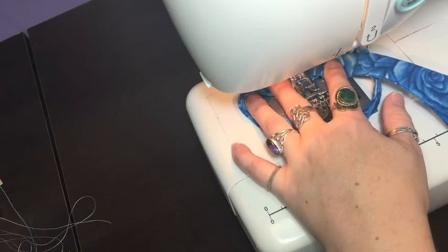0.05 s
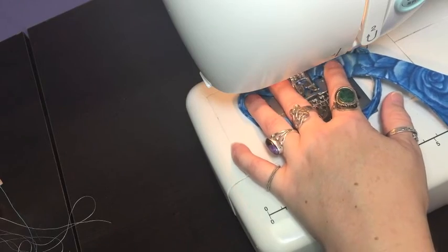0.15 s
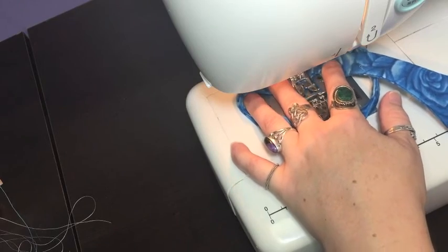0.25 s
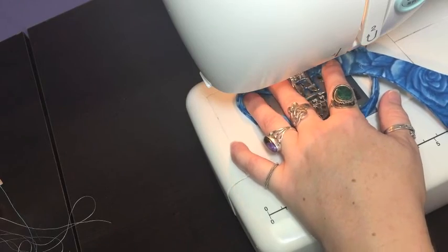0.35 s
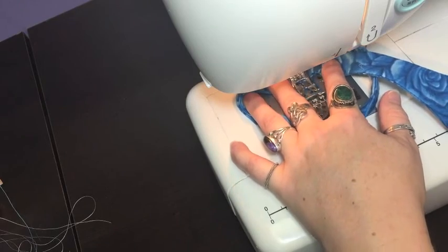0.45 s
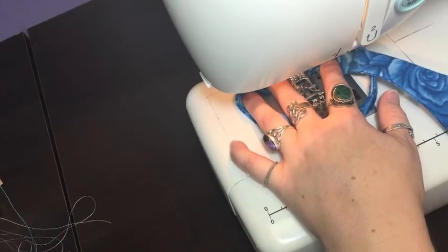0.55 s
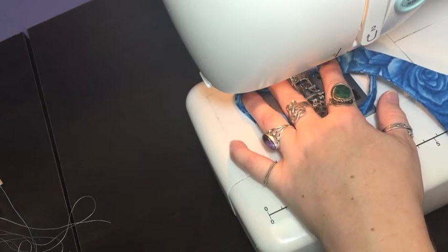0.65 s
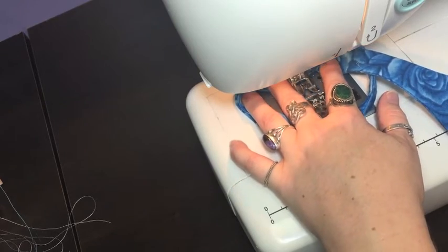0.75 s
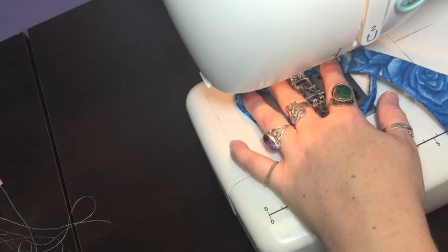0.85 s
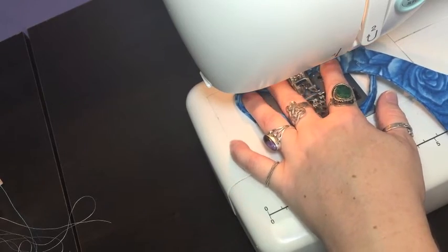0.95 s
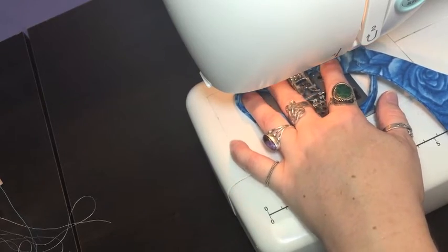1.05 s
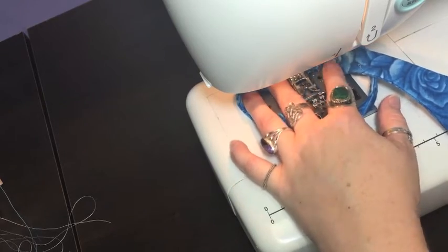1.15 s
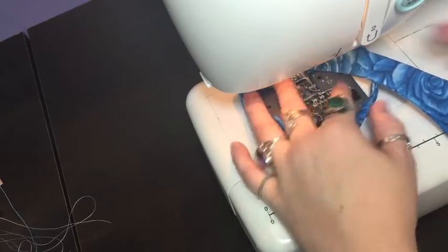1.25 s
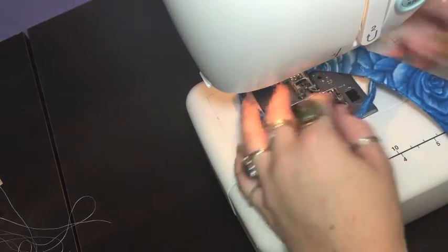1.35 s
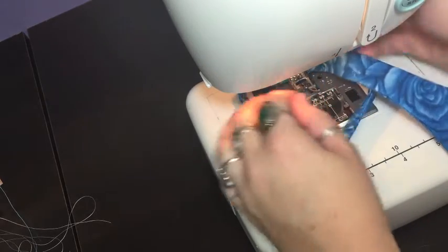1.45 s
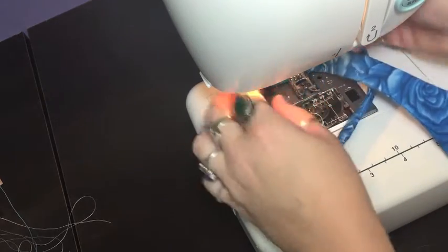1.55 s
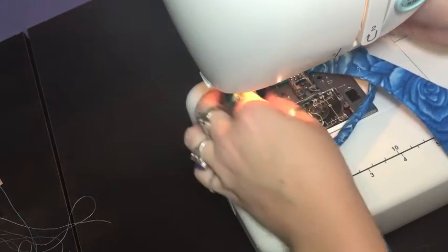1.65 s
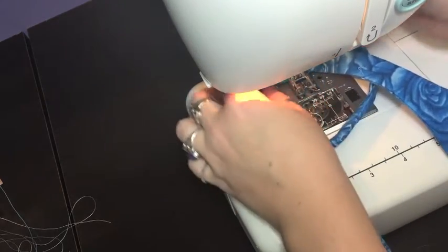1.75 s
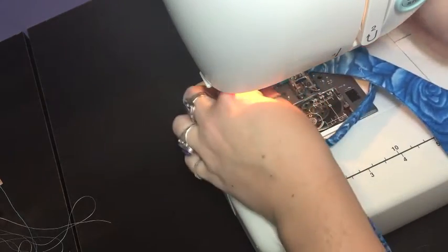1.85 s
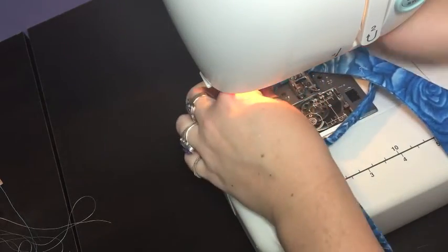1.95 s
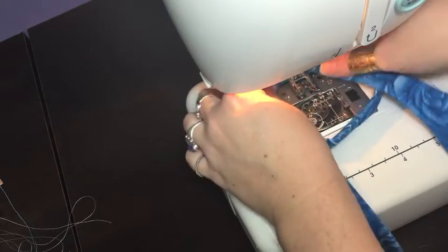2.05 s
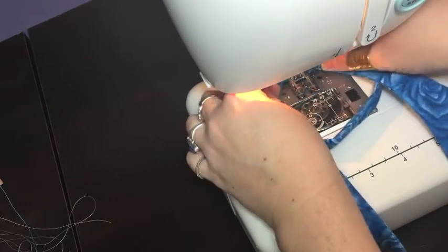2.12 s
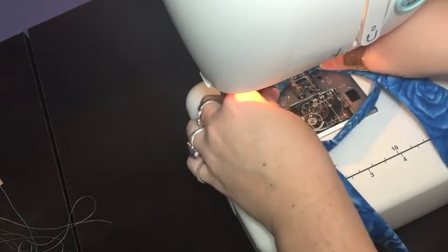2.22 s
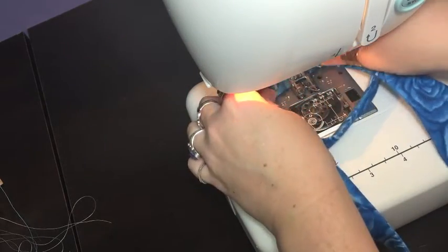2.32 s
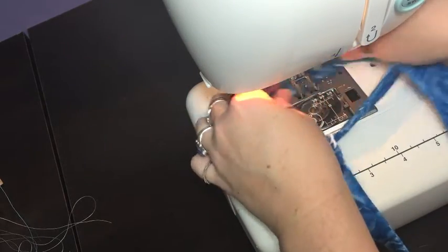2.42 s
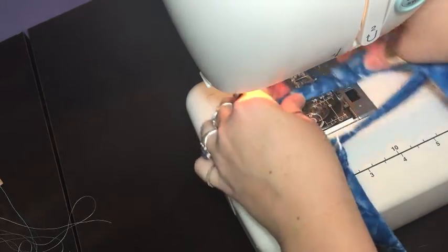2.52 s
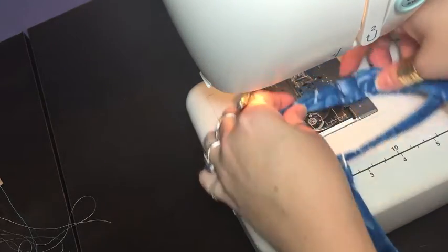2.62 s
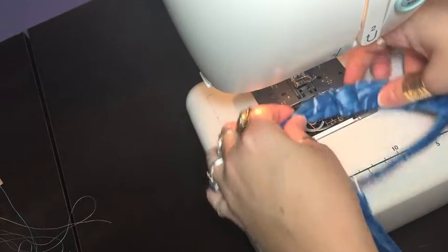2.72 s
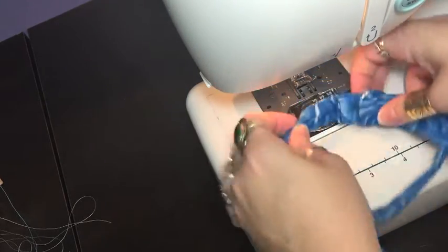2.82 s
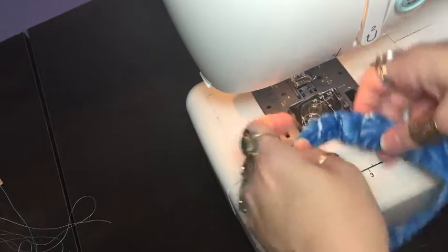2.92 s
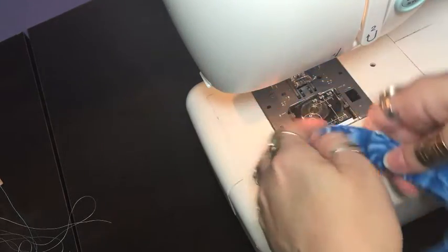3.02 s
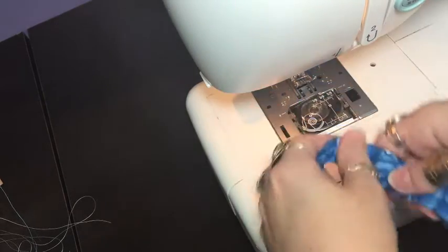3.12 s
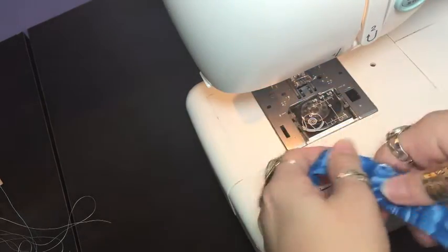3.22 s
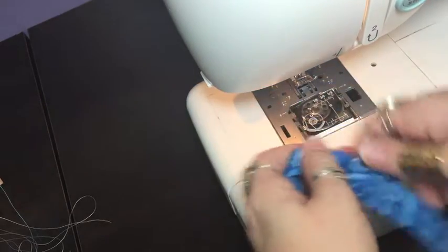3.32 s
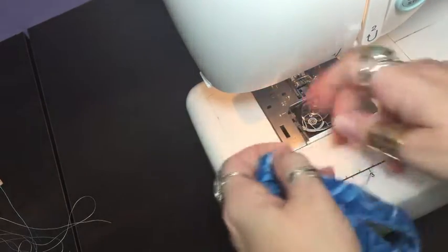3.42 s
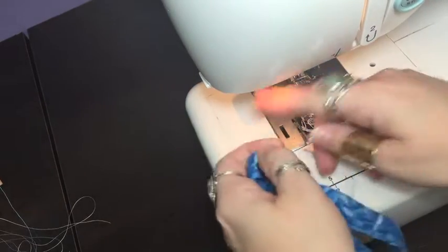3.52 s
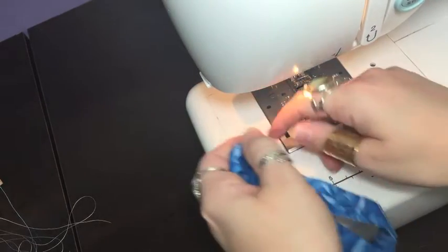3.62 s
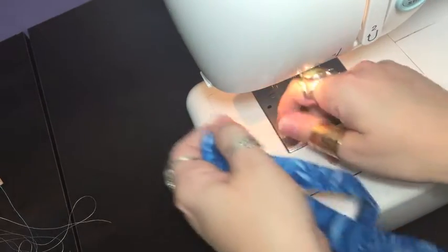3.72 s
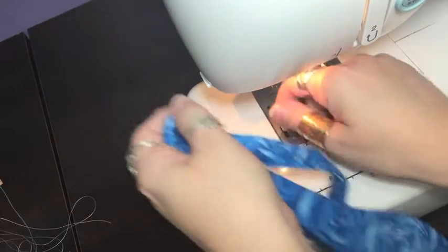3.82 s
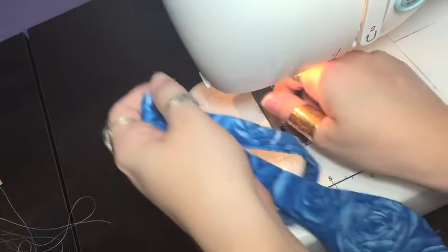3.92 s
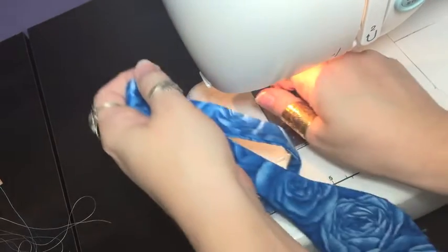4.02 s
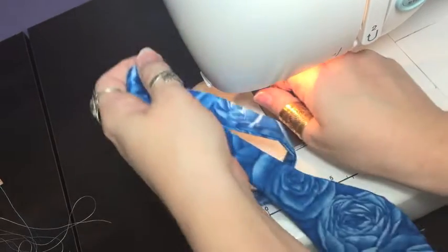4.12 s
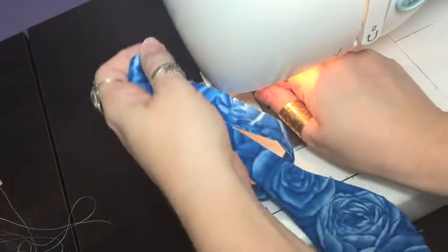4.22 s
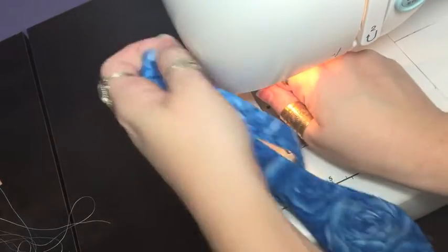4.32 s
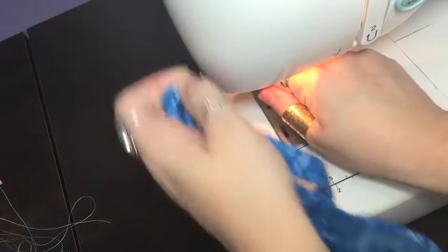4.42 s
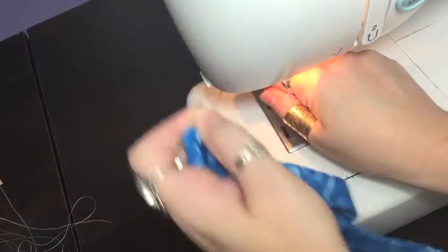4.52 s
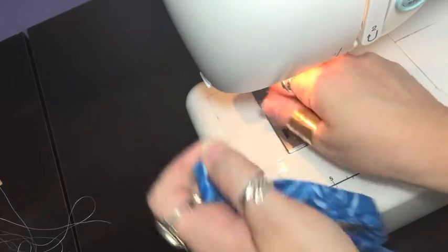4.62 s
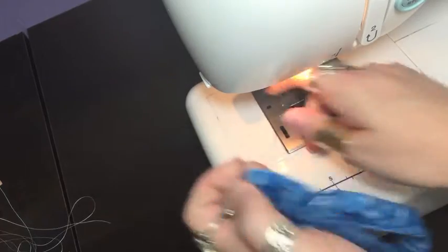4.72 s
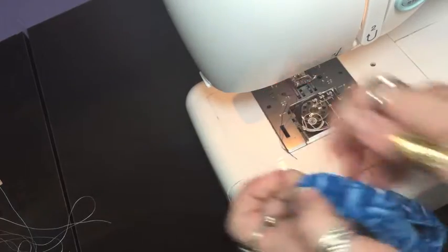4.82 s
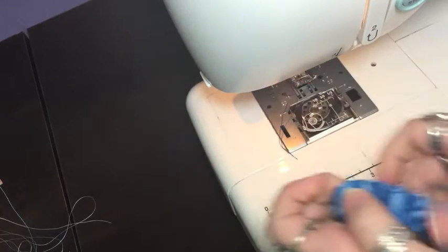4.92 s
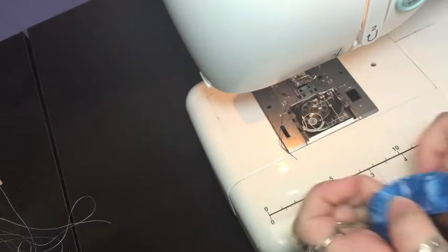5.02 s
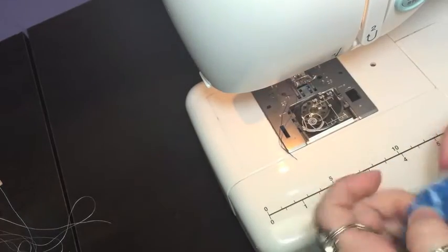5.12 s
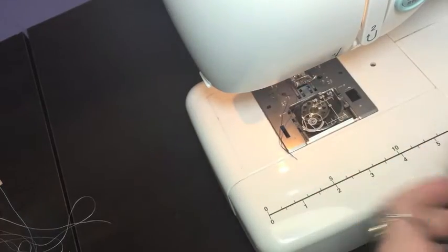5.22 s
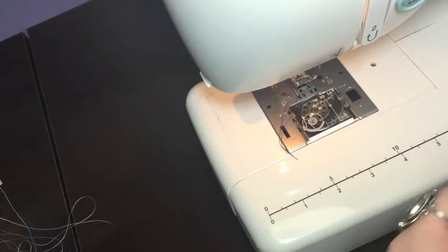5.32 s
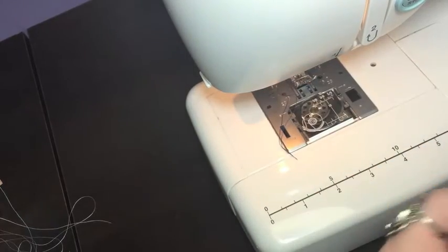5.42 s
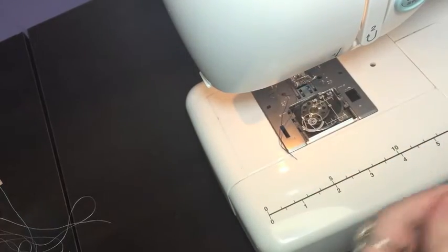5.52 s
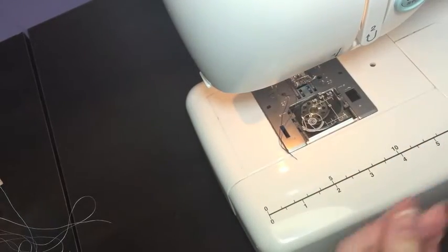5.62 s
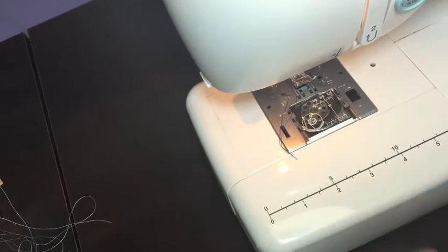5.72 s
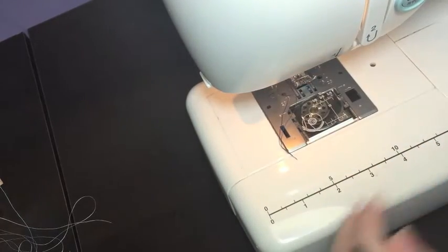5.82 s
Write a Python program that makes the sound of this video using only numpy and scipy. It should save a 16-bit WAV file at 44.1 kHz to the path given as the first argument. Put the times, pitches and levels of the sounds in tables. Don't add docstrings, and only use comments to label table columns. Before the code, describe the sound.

Low ragged motor hum with needle clacks ends abruptly, followed by sparse plastic and metal clicks, soft cloth rubbing and light table thumps.

```python
import sys
import numpy as np
from scipy import signal
from scipy.fft import rfft, irfft, next_fast_len
from scipy.io import wavfile
from scipy.ndimage import uniform_filter1d

SR = 44100
rng = np.random.default_rng(int(sys.argv[2]) if len(sys.argv) > 2 else 0)


def boost(x):
    u = np.asarray(x, float) / 20
    return 10 ** u


def generate_wav(signal):
    frames = np.transpose(np.atleast_2d(signal))
    scaled = np.clip(frames, -1, 1) * 32767
    pcm = np.round(scaled).astype(np.int16)
    wavfile.write(sys.argv[1], SR, pcm)


N = 258676
TIME = np.arange(N) / SR

# (frequency [Hz], density [dB per Hz])
AIR = [(13, -55), (22, -3), (43, 14), (125, -5.5), (217, -19), (263, -7.5), (347, -16), (432, -14),
       (618, -21), (988, -18.5), (2520, -27), (13200, -37.5), (16000, -36)]
# (middle [s], length [s], level [dB])
LEANS = [(0.0, 0.068, -55), (0.33, 0.43, -60), (0.68, .25, -56), (1.03, 0.27, -55), (1.24, 0.12, -56),
         (2.1, 0.49, -58.5), (2.47, .07, -62), (2.94, 0.25, -48), (3.2, 0.075, -56), (3.39, 0.2, -53.5),
         (3.9, 0.28, -54), (5.0, 0.29, -61), (5.23, 0.41, -52.5)]
# (middle [s], length [s], level [dB])
BUMPS = [
    (1.3, 1, -59.5),
    (2.47, 0.086, -55),
    (2.88, 0.3, -51.5),
    (3.14, 0.09, -56.5),
    (3.27, 0.15, -56.5),
    (3.5, 0.088, -48.5),
    (4.51, 0.16, -46),
    (5.04, 0.085, -43.5),
    (5.27, 0.09, -48),
    (5.65, 0.47, -66),
]
# (time [s], load [dB])
LOAD = [(0.0, -45.5), (0.11, -40.5), (.17, -40.5), (.22, -41), (0.3, -44.5), (.38, -44), (0.45, -43.5),
        (.53, -41.5), (0.6, -38.5), (0.67, -51), (.72, -52.5), (.77, -49), (0.84, -49), (.97, -47.5),
        (1.04, -47.5), (1.12, -46.5), (1.17, -71)]
# (middle [s], length [s], note level [dB])
STROKES = [
    (0.0, 0.099, -35),
    (0.09, 0.11, -35),
    (0.2, 0.063, -34.5),
    (0.3, .13, -34),
    (0.43, 0.15, -36.5),
    (0.6, 0.08, -36),
    (0.87, 0.23, -37),
    (1.11, 0.16, -46),
]
# (frequency [Hz], density [dB per Hz])
RUMBLE = [(82, -49), (140, -27), (158, -6.5), (296, -6), (799, -12), (968, -8.5), (1810, -28.5),
          (2750, -64), (3510, -37), (9000, -27.5), (11700, -91), (19800, -120)]
# (frequency [Hz], width [Hz], level [dB])
GEARS = [(194.6, 18, 0), (263, 24, -31), (293, 62, -12), (364, 10, -8), (457, 19, -1), (510, 9.6, -5),
         (960, 100, -35), (1220, 40, -28), (1440, 57, -20), (2040, 39, -17.5)]
# (time [s], peak [dB], lowest [Hz], highest
# [Hz])
TICKS = [(.002, -48, 1500, 9000), (2.3945, -39, 3000, 10000), (2.4095, -38, 2500, 9500),
         (2.4165, -46, 8000, 15500), (2.42, -46, 2800, 8000), (2.434, -40, 6300, 9500),
         (2.4415, -44, 6000, 10900), (2.4492, -40, 6000, 9000), (2.4495, -47, 9500, 14000),
         (2.463, -47, 9500, 11500), (2.474, -50, 5000, 10000), (4.4275, -38, 12000, 15500),
         (4.445, -38, 12500, 15500), (4.4715, -37, 11300, 13300), (4.421, -42, 3900, 5000),
         (4.3645, -52, 2200, 5200), (4.7642, -19, 1700, 3800), (2.476, -54, 9000, 15000),
         (2.4875, -43, 9500, 15500), (2.877, -45.5, 4000, 11000), (2.914, -58, 5000, 12000),
         (3.263, -56, 9000, 15000), (3.333, -66, 8000, 13000), (3.386, -51, 12000, 15500),
         (3.48, -57, 10500, 15000), (4.716, -56, 500, 1500), (4.7626, -25, 2000, 14000),
         (4.4725, -27, 1700, 3200), (1.971, -31.5, 905, 3480), (1.571, -33, 3000, 13900),
         (.092, -42, 600, 3030), (2.245, -58, 6000, 14000), (4.405, -56, 3500, 6000),
         (4.435, -52, 3500, 15000), (5.168, -57, 6500, 15000), (5.58, -63, 6000, 14000)]
CASE_HZ = [550, 745, 985, 1230, 1430, 1660, 1940, 2080, 2420, 2560, 2820, 3200, 3540, 3770, 4150, 4400,
           5200, 5600, 6500, 7500, 8300, 9700, 11500, 13300]
# (time [s], peak [dB], body share [dB], edge share [dB])
LINKAGE = [(0.0747, -46, 7, -17), (0.0914, -46.5, 14, -3), (0.1044, -51, 7, -5), (0.1486, -33, 1.5, -6),
           (0.1984, -33.5, 4.5, -1), (0.2201, -43, 12, 0), (0.2374, -53, 17, -22), (0.2721, -53, 16, -26),
           (0.4659, -32.5, -3, -10.5), (0.5178, -35.5, 3.5, -2.5), (0.5245, -29, -5, 0),
           (0.5474, -36.5, 5, -9), (0.5914, -39, 9.5, -24), (0.6, -49, 0, -28), (1.0096, -36, -0.5, -17)]
# (time [s], peak [dB], body share [dB], edge share [dB])
LEVER = [(1.5708, -22, -2.5, -9.5), (1.5844, -40, 9.5, -19), (1.6467, -40.5, 7, -23),
         (1.7185, -43.5, 11.5, -29), (1.7914, -42, 7.5, -13), (1.7974, -36.5, 5, -13),
         (1.9701, -36.5, 13.5, 0.5), (1.9816, -57, 16, -18), (2.2287, -40, 2, -10), (2.4862, -46, 11, -5),
         (3.4329, -70, 8, -16), (3.4574, -54, 5, -20), (3.464, -39, -0.5, -22), (4.0244, -48, -12, -22),
         (4.519, -47, 10.5, -19), (4.74, -48, 4, -4)]
# (time [s], peak [dB], body share [dB], edge share [dB])
JEWELS = [(1.735, -53, 2, -20), (1.7509, -42.5, 4.5, -25), (1.786, -46, 0, -8), (2.021, -61, 1, -13),
          (2.0543, -48.5, 7.5, -25), (2.072, -53, 8, -19), (2.1846, -36, -4, 6), (2.821, -35.5, -4, -36),
          (2.8583, -30, 0, -17), (3.3941, -45.5, -15, 9), (4.346, -44, -18, -25), (4.4448, -31, -13, -5),
          (4.471, -21.5, -12, -12.5), (4.6904, -43, -4, -7.5)]
# (time [s], peak [dB], body share [dB], edge share [dB])
PLATE = [(2.3942, -50, -16, -3), (2.4092, -45, -19, -10), (2.4346, -50, -12, -5), (2.797, -39.5, -4, -4),
         (3.7728, -19, -14.5, -21.5), (3.8302, -25, -6, -25), (3.9978, -47, -1.5, -10),
         (4.1117, -66, -8, 17.5), (4.4204, -41, -19, -5), (4.4269, -34, -15, -5),
         (4.7623, -17.5, -11.5, -2.5)]
# (middle [s], length [s],
# level [dB], frequency [Hz])
SQUEAKS = [(0.088, 0.044, -65, 3680), (0.088, 0.046, -63.5, 4700), (0.293, 0.072, -58, 990),
           (.3, 0.13, -50, 442), (.47, .07, -45.5, 450), (.57, 0.055, -52, 550), (.77, .05, -49, 403),
           (1.05, .1, -56, 505), (.88, 0.17, -70, 2050), (0.956, 0.037, -58, 960), (1.165, 0.021, -61, 930),
           (2.097, 0.067, -60.5, 1230), (2.51, .05, -52, 750), (2.575, .14, -59.5, 1606),
           (2.59, 0.1, -56, 750), (2.753, 0.11, -60.5, 750), (2.992, 0.081, -53, 1450),
           (2.991, 0.054, -62, 2700), (3.01, 0.042, -50.5, 750), (3.121, 0.062, -51, 1440),
           (3.136, .06, -65, 2450), (3.229, 0.06, -55, 750), (3.635, .03, -76, 6000),
           (3.74, 0.065, -77, 6000), (3.74, 0.084, -60, 1590), (3.928, 0.076, -72, 1660),
           (4.061, .06, -60, 750), (4.4, 0.05, -62, 4300), (3.445, .025, -60, 1700),
           (1.755, .022, -56, 2900), (1.795, .025, -53, 2750), (3.18, .06, -62, 2400),
           (2.875, .03, -57, 1500), (3.397, .02, -64, 2750), (3.745, .04, -66, 3100), (3.8, .05, -62, 5200),
           (4.93, .05, -71, 2000), (5.031, 0.06, -73, 2000), (5.13, .05, -73, 3700), (5.175, .04, -66, 750),
           (5.503, .04, -71, 1700), (5.65, .06, -75, 1750), (5.758, .1, -76, 2460)]
# (time [s], peak [dB], frequency [Hz], t60 [s])
THUDS = [(0.097, -34, 341, 0.086), (0.198, -40, 360, 0.12), (.275, -48, 418, 0.068),
         (.49, -44.5, 473, 0.072), (.83, -47.5, 296, 0.075), (.102, -39, 720, .06), (0.594, -38, 224, 0.12),
         (0.769, -41.5, 211, 0.04), (1.099, -45, 302, 0.1), (1.599, -48, 428, 0.11),
         (1.724, -38.5, 212, 0.16), (1.801, -36, 286, 0.025), (1.818, -47, 356, 0.083),
         (2.41, -44.5, 480, 0.089), (2.858, -46.5, 227, 0.23), (3.455, -40, 292, 0.1),
         (3.464, -47, 484, .05), (4.448, -43, 237, 0.051), (4.475, -39, 219, 0.16),
         (4.516, -50.5, 240, 0.11), (4.689, -47.5, 416, 0.11), (4.761, -47.5, 320, 0.15),
         (4.764, -43, 560, 0.052)]
# (time [s], peak [dB], frequency [Hz], t60 [s])
RINGS = [(.149, -42, 4100, .03), (.2, -43.5, 4740, 0.021), (0.27, -45.5, 2660, 0.044),
         (.525, -40, 3595, 0.037), (.525, -47, 4630, 0.036), (1.572, -42, 1315, .12),
         (1.572, -44, 2940, 0.096), (1.572, -46, 727, 0.08), (1.973, -33.5, 1714, .037),
         (1.971, -34, 670, 0.092), (1.972, -41, 1570, 0.14), (.2, -48, 3590, 0.12), (.6, -44, 1627, 0.2),
         (1.01, -43, 1230, 0.05), (1.969, -31.5, 2790, 0.029), (2.484, -45, 1475, 0.17),
         (2.824, -35.5, 2040, 0.09), (2.859, -43.5, 2055, 0.13), (2.856, -42, 2784, 0.088),
         (2.824, -44, 3760, 0.071), (2.823, -38, 1720, 0.086), (3.776, -33.5, 1655, 0.034),
         (3.774, -35, 3780, 0.057), (3.775, -41.5, 2595, 0.095), (3.774, -45, 5560, .03),
         (4.445, -39, 2770, 0.057), (4.471, -34, 4170, .04), (4.472, -36.5, 5900, .03),
         (3.774, -35.5, 4050, 0.073), (3.829, -34, 3840, 0.038), (3.997, -49.5, 2560, 0.04),
         (4.023, -50, 1460, 0.071), (4.299, -63.5, 990, .08), (4.346, -46, 2580, 0.047),
         (4.344, -48, 990, 0.053), (4.375, -56, 990, .04), (4.425, -51, 990, 0.048),
         (4.45, -43, 990, 0.063), (4.475, -30.5, 2660, 0.026), (4.692, -46.5, 1657, 0.078),
         (4.763, -23, 2410, 0.022), (4.764, -33, 1904, .04), (4.764, -30, 3190, 0.048),
         (4.764, -30, 2850, 0.043), (4.763, -39, 5550, 0.031), (4.764, -40, 4330, 0.049),
         (4.741, -52, 1700, 0.054), (4.69, -45, 500, .05), (3.463, -42, 980, .07)]
# (middle [s], length [s], pressure [dB])
PULLS = [(1.63, 0.25, -55.5), (1.81, 0.1, -55), (2.0, 0.11, -61.5), (2.1, 0.17, -70), (2.415, 0.054, -54),
         (2.455, 0.045, -45.5), (2.495, 0.054, -44.5), (2.575, 0.093, -53.5), (2.7, 0.46, -60.5),
         (2.89, 0.19, -53), (3.0, 0.081, -49.5), (3.11, 0.16, -53), (3.19, 0.062, -51),
         (3.26, 0.067, -55.5), (3.455, 0.054, -52.5), (3.81, 0.14, -47.5), (3.91, 0.22, -59),
         (4.04, .09, -56), (4.38, 0.086, -63), (4.46, 0.11, -55.5), (4.73, 0.1, -60), (5.18, 0.042, -64),
         (1.12, 0.023, -53), (5.23, .05, -72), (5.5, 0.099, -72), (5.7, .15, -71)]
# (middle [s], length [s], scrape [dB], weave hiss share [dB])
SCUFFS = [(1.604, 0.21, -68, -11), (1.75, 0.084, -61, -11), (2.11, 0.065, -69, -2), (2.43, 0.042, -78, 7),
          (2.459, 0.041, -50.5, -13), (2.855, 0.16, -65, -3.5), (3.06, 0.1, -70.5, 3),
          (3.16, 0.05, -73, -8), (3.265, 0.035, -86, 5), (3.393, 0.12, -86, 10), (3.797, 0.091, -62, -18),
          (4.01, 0.036, -61.5, -17), (4.39, 0.075, -57.5, -13), (4.445, 0.071, -54.5, -9),
          (4.52, 0.055, -66, -11), (5.126, 0.081, -81.5, 8), (5.18, .04, -74, -6), (5.58, .1, -75.5, -6),
          (3.612, .1, -81, 2), (3.477, .04, -74, 4)]
# (frequency [Hz], width [Hz], level [dB])
BED = [(385, 36, 4), (519, 50, 11), (750, 37, 14.5), (990, 47, 14.5), (1230, 15, 9), (1440, 39, 13),
       (1647, 9.6, 9.5), (1630, 32, -29), (2000, 53, -40), (2380, 75, -10.5)]
# (frequency [Hz], width [Hz], level [dB])
SCRAPE = [(2530, 90, 0), (3200, 120, -4), (4150, 200, 0), (4600, 150, -4), (6000, 300, -12)]


def unit(x):
    return x / np.sqrt(np.mean(x ** 2))


def noise():
    return rng.standard_normal(N)


def band(x, lo_hz, hi_hz):
    return signal.sosfilt(signal.butter(2, [lo_hz, hi_hz], "band", fs=SR, output="sos"), x)


def shaped(points):
    hz, db = np.transpose(points)
    f = np.maximum(np.arange(N // 2 + 1) * SR / N, 1)
    return irfft(rfft(noise()) * boost(np.interp(np.log(f), np.log(hz), db)), N)


def walk(rate_hz):
    k = int(SR / rate_hz)
    held = np.repeat(rng.standard_normal(N // k + 1), k)
    return 0.74 * uniform_filter1d(uniform_filter1d(held, k), k)[:N]


def resonate(x, modes, flicker_db=0):
    out = np.zeros(N)
    for hz, width, db in modes:
        ringing = signal.lfilter(*signal.iirpeak(hz, hz / width, SR), x)
        out += boost(db + flicker_db * walk(22.03)) * ringing / np.sqrt(width)
    return out


def even(x, share):
    envelope = np.abs(signal.hilbert(x, next_fast_len(N))[:N] + 1e-9)
    return unit(x / envelope ** share)


def steady(x, size=2600):
    return x / np.sqrt(uniform_filter1d(x ** 2, size=size))


def swells(rows, rest_db=-120):
    t = TIME[::32]
    power = boost(2 * rest_db)
    for s, length, db in rows:
        power = power + boost(2 * db) * np.exp(-8 * ((t - s) / length) ** 2)
    return np.interp(TIME, t, np.sqrt(power))


def add(track, s, sound):
    i = int(s * SR)
    track[i:i + len(sound)] += sound[:N - i]


def air():
    hiss = shaped(AIR)
    room = band(hiss, 117.5, 20000) * boost(-66 + 1.1 * walk(2.24)) / np.std(band(hiss, 150, 15000))
    hum = boost(-67.5) * unit(resonate(noise(), [(187.3, 13.6, 0)], 4.7))
    stir = boost(-89.5) * unit(resonate(noise(), BED, 2.6))
    fan_modes = [(985, 68, 1.0), (1783, 140, 2.5), (2000, 92, -5), (2420, 140, -5)]  # Hz, width Hz, dB
    fan = unit(resonate(noise(), fan_modes, 3.8))
    return room + hum + stir + swells([(5.25, 2.5, -73), (1.26, 0.44, -73)], -80.5) * fan


def table():
    after = np.clip((TIME - 1.17) / 0.064, 0, 1)
    sway = resonate(noise(), [(58, 16, 0)])
    note = resonate(noise(), [(122.8, 22, 0)])
    swaying = swells(LEANS, rest_db=-63.5) * even(band(sway, 49, 82), 0.3)
    humming = swells(BUMPS, rest_db=-60.5) * even(band(note, 85, 153), 0.35)
    return swaying + after * humming


def motor():
    load_db = np.interp(TIME, *np.transpose(LOAD))
    stop_s, whine_hz, waver_hz = 1.246, 2760, 110
    running = np.clip((stop_s - TIME) / 0.073, 0, 1)

    turn = 2 * np.pi * 122.5 * TIME + 0.7 * walk(41.23)
    note = np.sin(turn) + 0.13 * np.sin(2 * turn + .6) + .08 * np.sin(3 * turn)
    note = note * np.sqrt(2) * swells(STROKES, -60) * boost(2.6 * walk(34.3))

    mesh = noise() * boost(3.5 * walk(160))
    broad = unit(shaped(RUMBLE)) * boost(1.4 * walk(89.8) + 3.2 * walk(24.7))
    frame = unit(resonate(mesh, GEARS, 9.2)) + boost(-1.0) * broad
    rumble = steady(band(frame, 198, 1024))
    rasp = steady(band(frame, 720, 4160)) + boost(-24.0) * unit(band(mesh, 2200, 11600))

    breathy = even(resonate(noise(), [(whine_hz, 130, 0)]), 0.25)
    whine_turn = 2 * np.pi * np.cumsum(whine_hz + waver_hz * walk(45)) / SR
    whine = .9 * breathy + .7 * np.sin(whine_turn) * boost(3 * walk(30))
    whine += boost(-7) * unit(resonate(mesh, [(3200, 90, 0), (3650, 60, -5), (2030, 70, -8)]))

    rasp_gain = boost(-48 + 1.5 * (load_db + 42.5))
    whine_gain = boost(-62.5 + 0.7 * (load_db + 40.5) + 2.7 * walk(14.5))
    return running * (note + boost(load_db) * rumble + rasp_gain * rasp + whine_gain * whine)


def ticks():
    out, t = np.zeros(N), np.arange(int(.03 * SR)) / SR
    for s, db, lo_hz, hi_hz in TICKS:
        snap = rng.standard_normal(len(t)) * np.exp(-t / 0.0022)
        tick = band(band(snap, lo_hz, hi_hz), lo_hz, hi_hz)
        add(out, s, boost(db) * tick / np.abs(tick).max())
    return out


def clicks(rows, t60_s, low_db, close_s):
    out, t, modes = np.zeros(N), np.arange(int(.14 * SR)) / SR, np.array(CASE_HZ)[:, None]
    fall = np.log(1000) * t / t60_s
    rise = 1 - np.exp(-t / close_s)
    mode_decay = np.exp(-1.2 * fall * (modes / 2000) ** .3)
    crack_decay = 1.04 * np.exp(-t / 0.00078) + np.exp(-1.1 * fall) + boost(-42.0) * np.exp(-.3 * fall)
    for s, db, mid_db, top_db in rows:
        level_chance, pitch_chance = rng.standard_normal((2, len(modes), 1))
        rough, bright = rng.standard_normal((2, len(t)))
        chatter = (rough ** 3 * np.exp(-2.2 * fall) * rise)[:900]
        tones = np.sin(2 * np.pi * modes * (1 + 0.023 * pitch_chance) * t)
        ring = np.sum(boost(2.1 * level_chance) * mode_decay * tones, axis=0)
        blow = signal.fftconvolve(ring, chatter)[:len(t)]
        crack = band(bright, 210, 14000) * rise * crack_decay
        blow = blow / np.abs(blow).max() + 0.74 * crack
        shares = ((580, 1050, mid_db + low_db), (1050, 2100, mid_db), (2200, 6500, 0), (6800, 16000, top_db))
        for lo, hi, share_db in shares:
            part = band(band(blow, lo, hi), lo, hi) * np.exp(-.3 * fall * (lo / 6800) ** 2)
            add(out, s, boost(db + share_db - 4.5) * part / np.abs(part).max())
    return out


def machine_clicks():
    return (clicks(LINKAGE, t60_s=0.042, low_db=-2.1, close_s=0.0027)
            + clicks(LEVER, t60_s=0.033, low_db=-2.5, close_s=0.0013)
            + clicks(JEWELS, t60_s=0.03, low_db=-12, close_s=0.0023)
            + clicks(PLATE, t60_s=0.04, low_db=-4.5, close_s=0.00036))


def squeaks():
    out, t = np.zeros(N), np.arange(-.2 * SR, .2 * SR) / SR
    for s, length, db, hz in SQUEAKS:
        half_hz = 45 + .01 * hz
        tone = unit(band(rng.standard_normal(len(t)), hz - half_hz, hz + half_hz))
        bell = boost(db) * tone * np.exp(-4 * (t / length) ** 2)
        add(out, max(s - .2, 0), bell[int(max(.2 - s, 0) * SR):])
    return out


def thuds():
    out, t = np.zeros(N), np.arange(int(.3 * SR)) / SR
    for s, db, hz, t60 in THUDS:
        push = rng.standard_normal(len(t)) * np.exp(-np.log(1000) * t / t60) * (1 - np.exp(-t / 0.0011))
        knock = band(push, hz / 1.167, hz * 1.28) + 0.31 * band(push, 154, 483)
        add(out, s, boost(db + 6.5) * knock / np.abs(knock).max())
    return out


def rings():
    out, t = np.zeros(N), np.arange(int(.25 * SR)) / SR
    for s, db, hz, t60 in RINGS:
        rough = unit(band(rng.standard_normal(len(t)), hz * .95, hz * 1.05))
        tone = np.sin(2 * np.pi * hz * t) + .9 * rough
        rise = 1 - np.exp(-t / (0.0032 * t60))
        add(out, s, boost(db) * tone * rise * np.exp(-np.log(1000) * t / t60))
    return out


def cloth():
    grains = noise() * boost(5 * walk(330) + 1.2 * walk(40))
    flicker_db = 4.5
    loose = boost(-8.5) * unit(band(grains, 200, 620)) + boost(-13.5) * unit(band(grains, 670, 3000))
    hollow = boost(-4) * unit(resonate(grains, BED, flicker_db)) + loose
    bed = steady(band(band(hollow, 200, 3300), 150, 4200))

    plate = unit(resonate(grains, SCRAPE, flicker_db))
    scrape = steady(plate + unit(band(band(grains, 2300, 4800), 2000, 6000)), size=900)

    fibres = noise() * boost(3.5 * walk(400))
    hiss = np.zeros(N)
    for hz, db in ((3800, 0), (5600, 0), (8000, -3)):
        hiss += boost(db + 2.0 * walk(30)) * band(fibres, hz, 2.2 * hz)
    hiss = steady(hiss)

    scuff = swells([(s, length, db) for s, length, db, _ in SCUFFS])
    weave = swells([(s, length, db + share_db) for s, length, db, share_db in SCUFFS])
    return swells(PULLS) * (bed + boost(-26.5) * hiss) + scuff * scrape + weave * hiss


def room_tail(blows):
    t = np.arange(int(.4 * SR)) / SR
    tail = rng.standard_normal(len(t)) * np.exp(-np.log(1000) * t / 0.22) * (t > .004)
    tail = band(tail, 220, 8900)
    return signal.fftconvolve(blows, tail / np.sqrt(np.sum(tail ** 2)))[:N]


def scene():
    parts = rings()
    blows = ticks() + machine_clicks() + thuds() + parts
    wet = room_tail(blows - 0.6 * parts)
    mix = air() + table() + motor() + squeaks() + cloth() + blows + boost(-14) * wet
    return mix[None]


def top_cut(x):
    return signal.sosfilt(signal.butter(12, 16490, fs=SR, output="sos"), x)


def record(dry):
    cut = signal.sosfilt(signal.ellip(6, .3, 24, 15250, fs=SR, output="sos"), dry)
    return top_cut(cut)


dry = scene()
out = record(dry)
generate_wav(out)
```